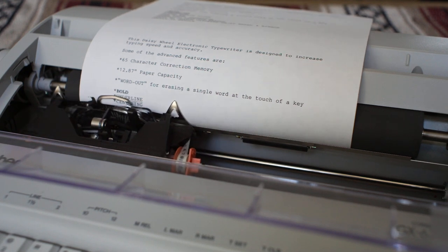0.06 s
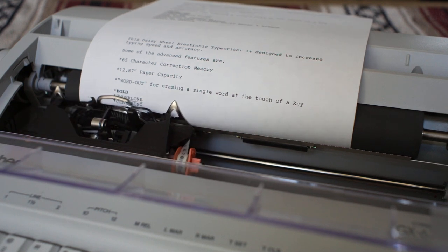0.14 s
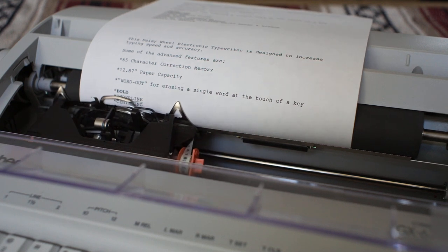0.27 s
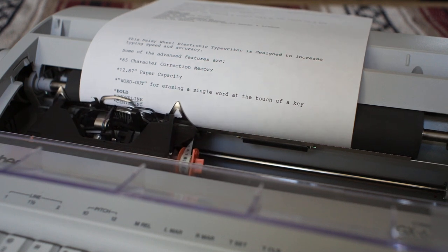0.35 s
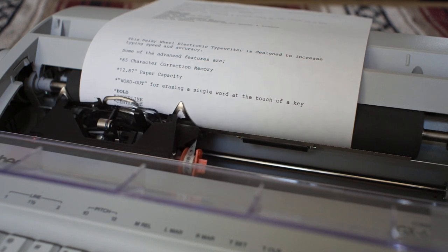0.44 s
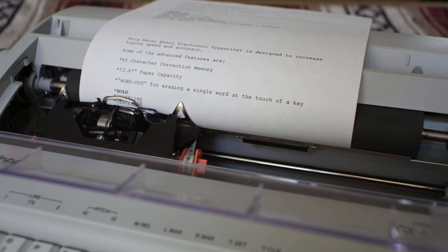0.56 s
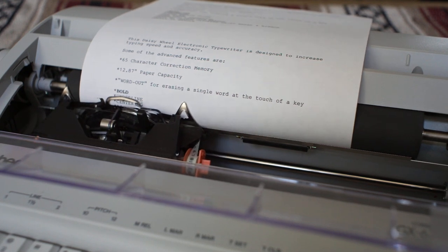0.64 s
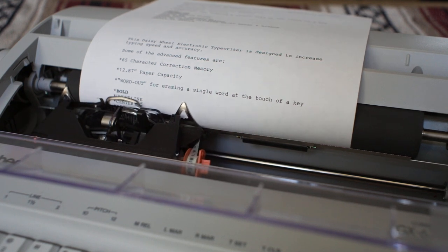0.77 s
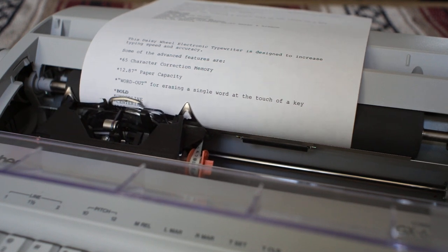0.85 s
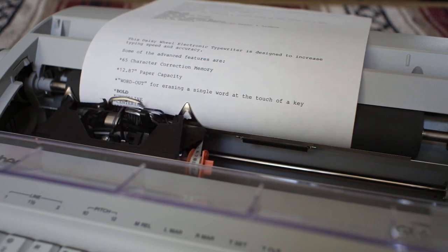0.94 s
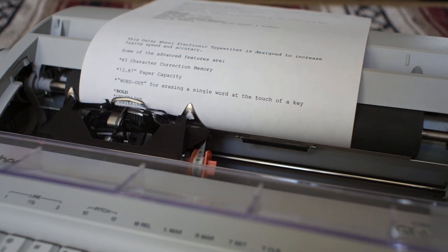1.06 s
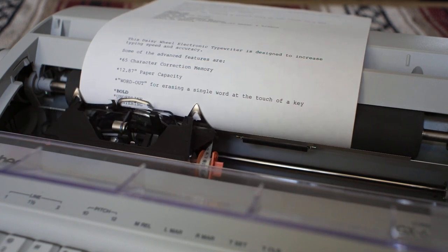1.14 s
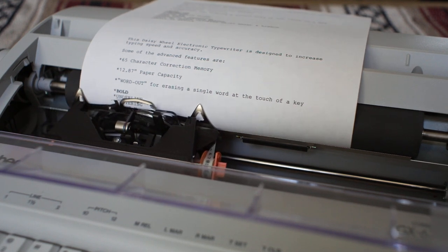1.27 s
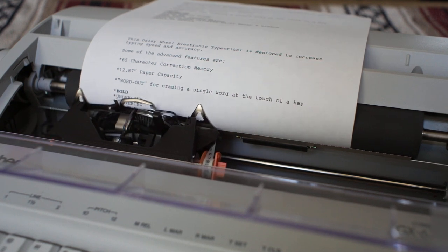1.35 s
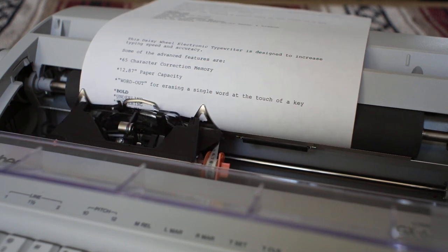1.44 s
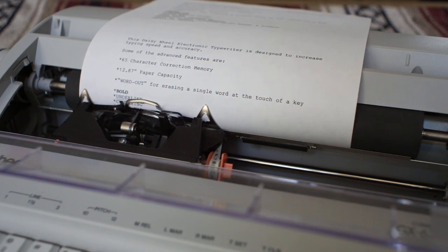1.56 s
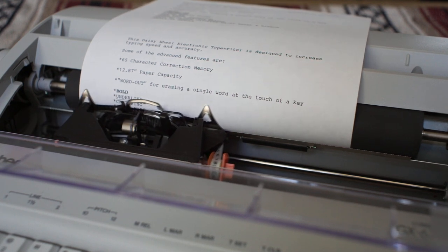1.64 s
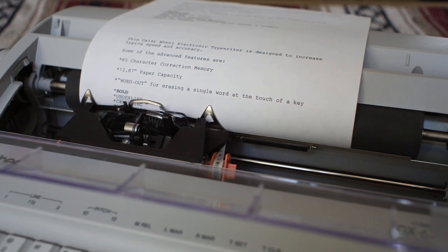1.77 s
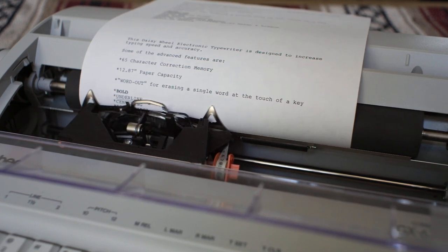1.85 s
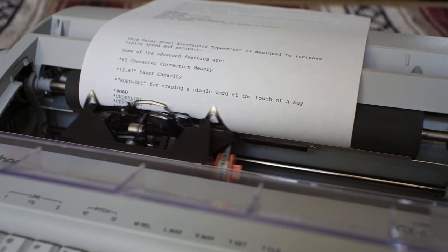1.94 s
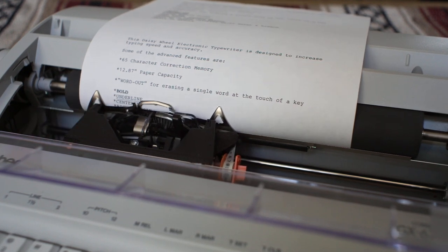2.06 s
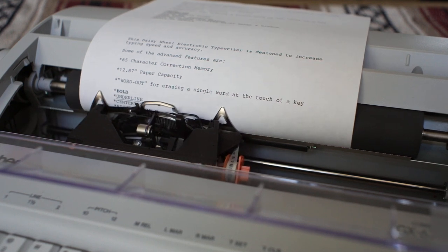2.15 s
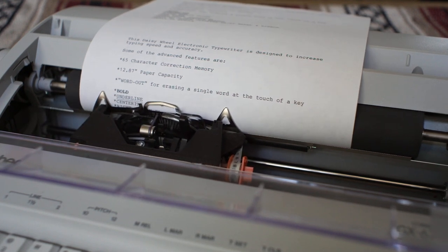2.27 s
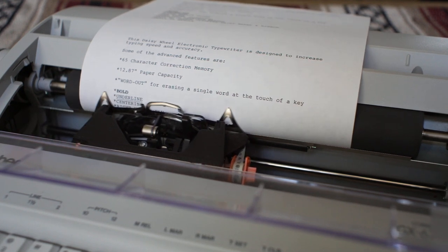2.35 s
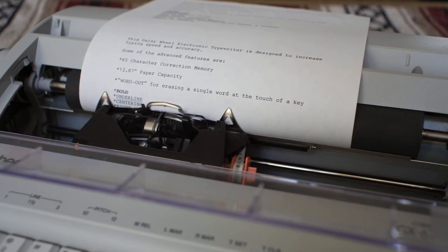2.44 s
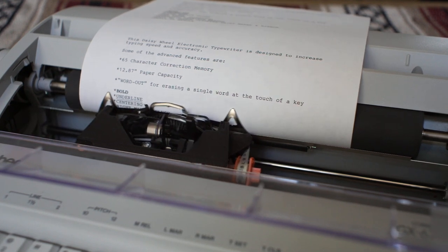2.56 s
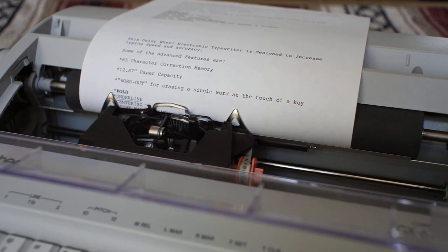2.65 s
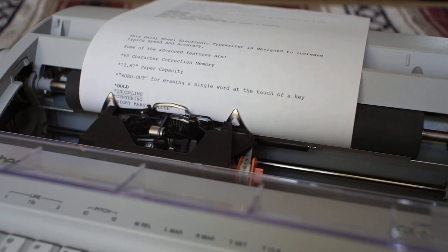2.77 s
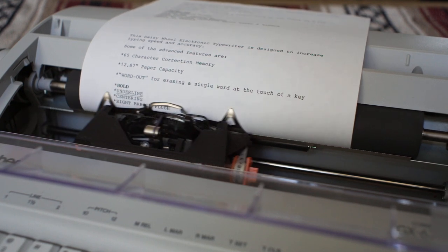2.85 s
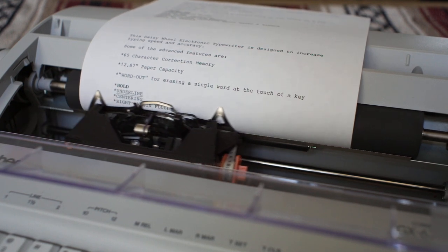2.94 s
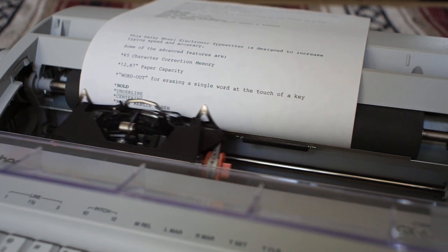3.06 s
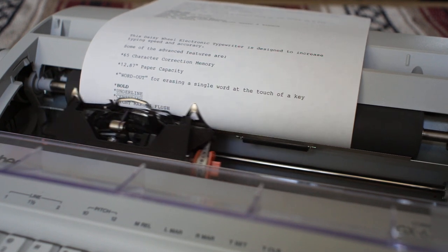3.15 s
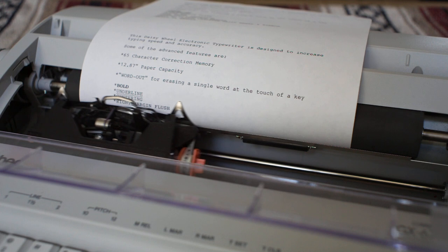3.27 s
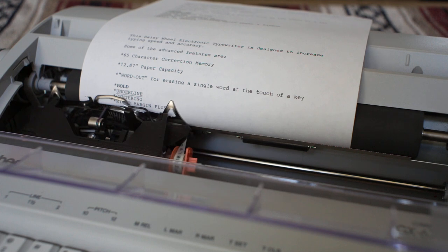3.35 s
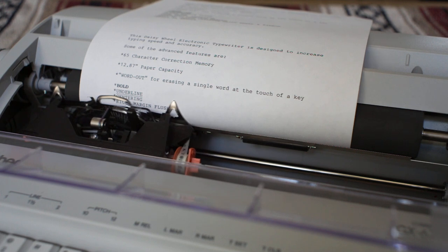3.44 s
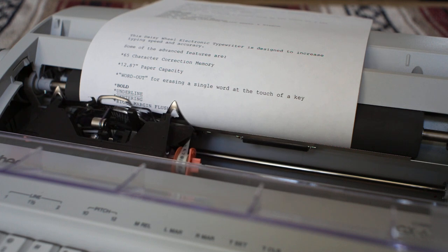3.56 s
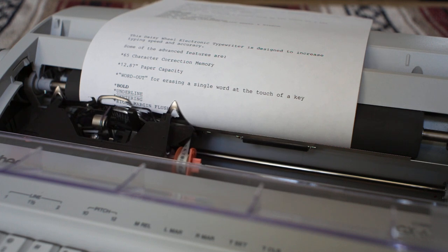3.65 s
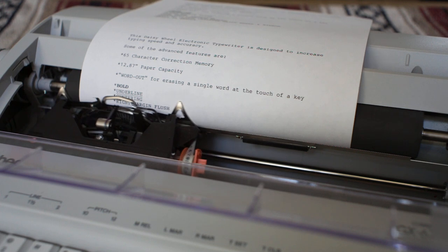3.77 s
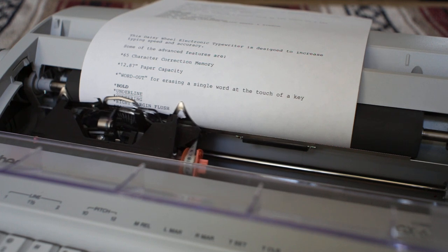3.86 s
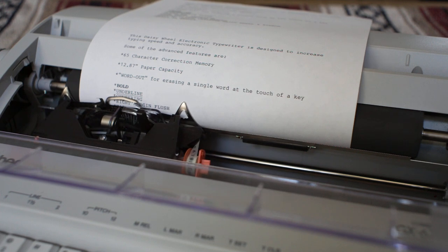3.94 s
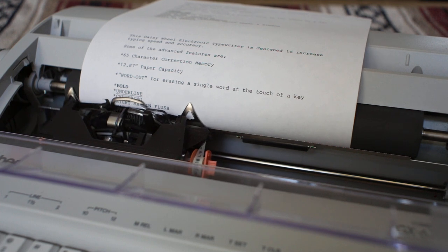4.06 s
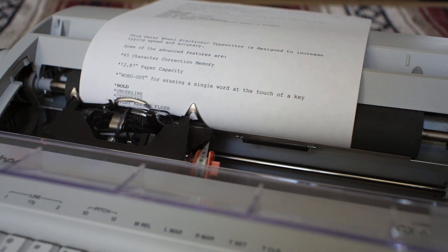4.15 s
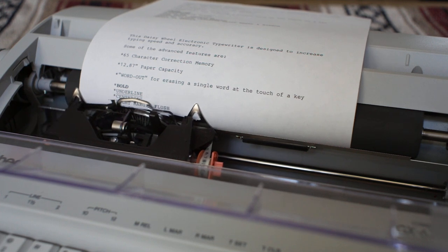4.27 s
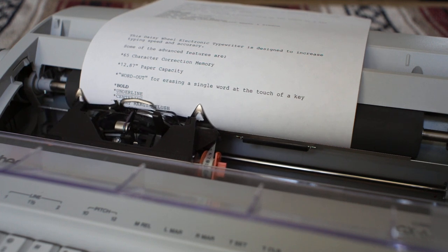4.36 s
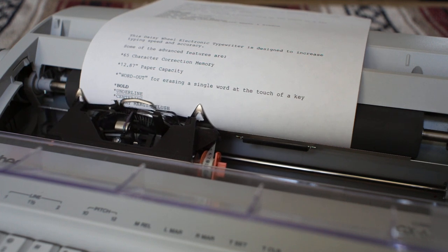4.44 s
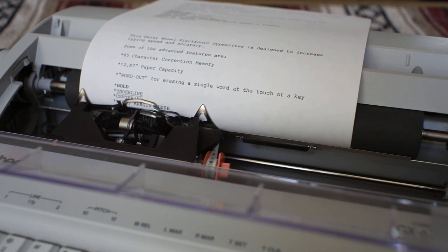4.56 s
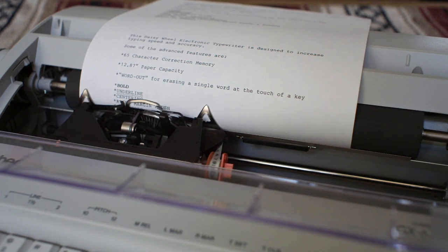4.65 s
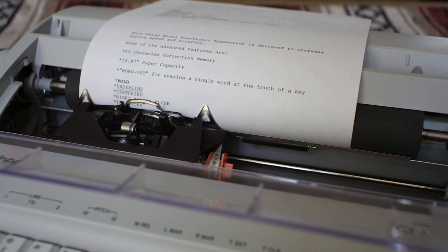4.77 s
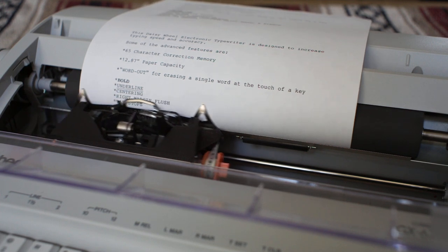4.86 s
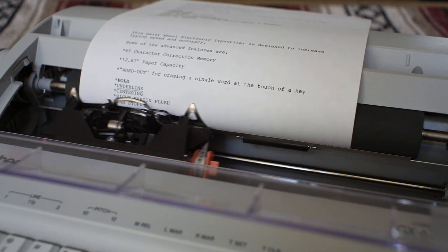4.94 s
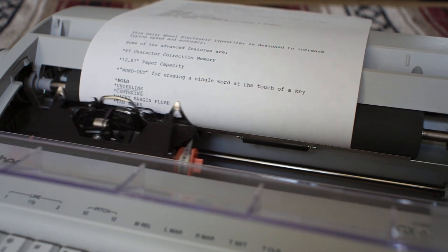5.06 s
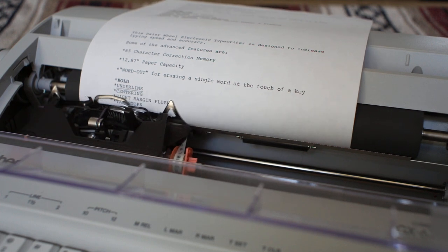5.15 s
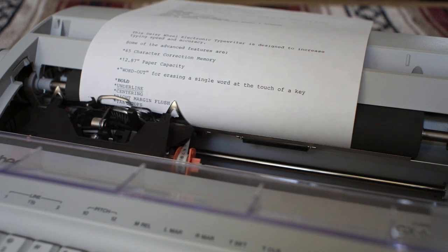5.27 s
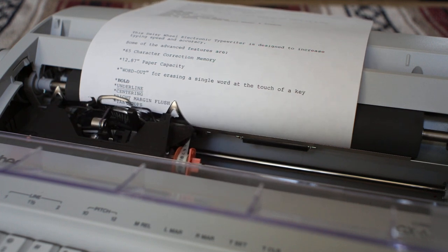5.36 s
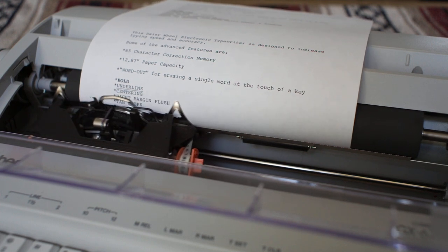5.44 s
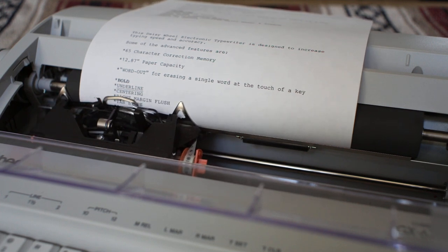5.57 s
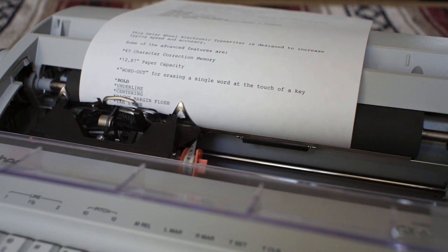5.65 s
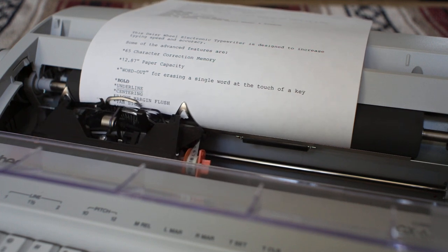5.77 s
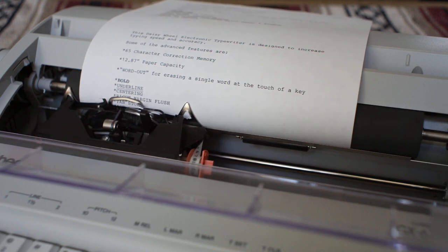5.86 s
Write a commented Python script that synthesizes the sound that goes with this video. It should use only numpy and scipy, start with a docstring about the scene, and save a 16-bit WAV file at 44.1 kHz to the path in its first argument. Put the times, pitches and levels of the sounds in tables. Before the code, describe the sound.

Close microphone on a desktop printing typewriter, dry with a short room tail. Seventeen snappy strikes come in a slightly uneven stream, quickening as they go, then a pause with a low steady buzz, clunky gears and soft motor whine. Nine more strikes, a second, briefer return, then four more until the end. Plastic case knocks and small carriage rattles sit under every hit; the background is very quiet.

```python
"""A platen feed dies away and a small motor whines up; an electric daisy wheel typewriter then prints.
Three short lines in a small room. Per letter: latch and ribbon pawl tick, hammer strikes and rebounds,
carriage steps on. Between lines the carriage hums back and the platen feeds the paper.
Contacts are noise bursts through resonant bodies; case and thud are decaying sines; motor and stepper
are wavering tones plus coloured noise."""
import sys
import numpy as np
from scipy import signal
from scipy.fft import rfft, irfft, next_fast_len
from scipy.io import wavfile
from scipy.ndimage import map_coordinates

SR = 44100
rng = np.random.default_rng(int(sys.argv[2]) if len(sys.argv) > 2 else 0)


def bounce(signal):
    """Save signal as a 16-bit WAV file at the path given by the first command-line argument."""
    frames = np.transpose(np.atleast_2d(signal))
    limited = np.clip(frames, -1, 1)
    pcm = np.round(limited * 32767).astype(np.int16)
    wavfile.write(sys.argv[1], SR, pcm)


N = 260631

# printed letters: [blow t/s, treble tilt of the petal's strike/dB]
LETTERS = [(0.269, 0.5), (0.448, 0.5), (0.6562, -1), (0.8436, 0.5), (1.0173, -3), (1.1386, -3.5),
           (1.2877, -4), (1.4433, -1), (1.5983, -3), (1.7037, -0.5), (1.8901, -4.5), (1.9896, 1.5),
           (2.156, -2.5), (2.2713, -0.5), (2.395, 2.5), (2.5152, 4.5), (2.6267, 0.5), (3.7145, 0.5),
           (3.8134, 2), (3.9131, 0), (4.0116, -0.5), (4.1409, -3.5), (4.2396, -5), (4.3833, -3),
           (4.5377, -2), (4.6375, -2), (5.483, -1), (5.5873, 1.5), (5.7183, 1.5), (5.8463, -4.5)]
# *_COLOUR: broad spectrum of a part [f/Hz, level/dB]
# *_MODES: resonances on top of it [f/Hz, width/Hz, height/dB]
# hammer driving a petal into the platen
HAMMER_COLOUR = [(100, -24), (160, -39), (300, -2.5), (600, -15.5), (1150, -13.5), (1600, -3), (2300, 2),
                 (4000, -2.5), (6300, -3), (7200, -8.5), (9300, 1), (12000, -8.5), (13500, -17.5),
                 (15800, -29)]
HAMMER_MODES = [(383, 500, 2.9), (862, 324, 13.4), (1503, 180, 8.1), (1820, 75, 2.8), (2146, 154, 6),
                (2357, 186, 9.05), (2585, 150, 3.3), (2868, 155, 7.7), (3270, 100, 6.6), (3837, 123, 7.9),
                (4360, 260, 5), (5100, 410, 4.7), (6465, 230, 7.5)]
# hammer falling back on its stop
REBOUND_COLOUR = [(100, -14.5), (300, -4.1), (700, -12.5), (1600, 0.5), (4000, -1), (7200, -7.5),
                  (9300, -2), (12000, -6), (13500, -17), (15800, -18)]
REBOUND_MODES = [(547, 190, 12.6), (830, 46, 11.8), (1065, 100, 9.1), (1489, 107, 8.2), (1680, 140, 6.9),
                 (2108, 83, 7.2), (6700, 420, 8.3), (8800, 890, 6.2), (11350, 240, 5.6)]
# latch pulling in
LATCH_COLOUR = [(200, -24), (700, -6.5), (1600, 2), (4000, 0.5), (7500, -7.5), (11500, -7.5),
                (13500, -26.5), (15800, -24)]
LATCH_MODES = [(750, 310, 7), (1384, 200, 7.8), (1865, 99, 10.2), (2190, 71, 10.3), (3270, 370, 8.8),
               (6500, 620, 8.6), (8700, 680, 6.3)]
# ribbon pawl
PAWL_COLOUR = [(200, -21), (500, -7.5), (2000, -7), (7500, -4.5), (10000, -1), (13500, -13.5),
               (15800, -28.5)]
PAWL_MODES = [(2010, 510, 6.4), (3500, 74, 2.8), (9100, 341, 4.5), (14600, 416, 6.4), (15241, 563, 12.1)]
# trigger freeing the hammer spring
TRIGGER_COLOUR = [(200, -8.5), (900, -9.5), (2000, 1), (4000, -7), (12000, -16), (14000, -38),
                  (15800, -26.5)]
TRIGGER_MODES = [(4800, 570, 7.5), (8400, 946, 8), (12897, 1347, 12.4)]
# carriage rattle and stop
CARRIAGE_COLOUR = [(40, -3), (140, -9), (400, -1), (1000, 1), (2300, -3), (7000, -9.5), (9000, -8.5),
                   (11500, -17), (14000, -27), (15800, -31.3)]
CARRIAGE_MODES = [(66, 20, 4), (93, 28, 10), (184, 36, 10), (335, 55, 5), (450, 45, 4), (815, 110, 4),
                  (2450, 50, 5), (3200, 150, 3)]
# hammer spring; also colours the motor's gear whirr
SPRING_COLOUR = [(100, -19), (700, -4), (1100, -7), (1500, 0), (2200, 0), (3000, -9), (10000, -17),
                 (15000, -33)]
# carriage and platen gears
GEARS_COLOUR = [(59, -43), (100, -22), (156, -3.5), (645, -2), (1010, -2.5), (1500, -1.5), (1980, -6),
                (2450, -2.5), (2720, -5.5), (3230, -10.5), (4340, -15), (8920, -18.5), (12000, -27),
                (15800, -39)]
GEARS_MODES = [(185, 70, 5), (560, 90, 4), (860, 110, 5), (1500, 120, 4), (2250, 150, 3), (3250, 260, 8)]
# plastic case booms, steel frame rings: [f/Hz, level/dB, t60/s]
CASE_MODES = [(66.4, -68.5, 0.43), (90, -61, 0.091), (112, -74, 0.069), (178.8, -67.5, 0.31),
              (261, -65, 0.073), (298, -53.5, 0.08), (548.3, -44, 0.058), (1277, -42, 0.04),
              (1854, -47, 0.066), (2160, -49.5, 0.061), (2420, -60, 0.17), (2640, -47, .07),
              (4050, -56.5, 0.15), (4740, -59.5, 0.16), (5500, -62, 0.12), (8900, -67, 0.068)]
# carriage runs back: [start t/s, end t/s]
RETURNS = [(2.894, 3.42), (4.9055, 5.197)]
# stepper hum: [multiple of STEP_HZ, level/dB]
STEP_ORDERS = [(1, -73.5), (3, -91), (4, -88.5)]
# carriage sliding on its rail: [f/Hz, level/dB]
SLIDE_COLOUR = [(120, -13), (250, 2), (400, 7), (600, 10), (1000, -12.5), (1900, -12.5), (2800, -8.5),
                (4000, -35.5), (10000, -15), (15000, -34)]
# room tone: [f/Hz, level/dB]
AIR_COLOUR = [(20, -16), (45, -7), (62, -7), (100, -13), (137, -19), (414, -9.5), (1100, -10.5),
              (1500, -10.5), (3050, -20), (5520, -27), (10000, -27.5), (15800, -35)]
# stereo width: [f/Hz, side level/dB]
SIDE_WIDTH = [(30, -19), (70, -19), (150, -20), (600, -16), (1200, -23), (2800, -24), (4500, -12),
              (6500, -25), (9000, -36), (13000, -17)]
# room decay: [f/Hz, t60/s]
ROOM_T60 = [(100, 0.15), (500, 0.49), (2000, 0.35), (5000, 0.35), (10000, 0.24), (15000, 0.25)]
# room spectrum: [f/Hz, level/dB]
ROOM_COLOUR = [(60, 6), (200, -3), (600, 1), (2300, -3), (5000, -1.5), (10000, -2), (15000, -15)]
# gear jolts as the carriage sets off: [delay/s, level/dB, rise/s, t60/s, treble tilt/dB]
SET_OFF = [(0, -33, 0.0026, 0.068, -15), (0.0082, -25.5, 0.0011, 0.079, 10), (0.0264, -34, 0.0013, 0.06, 6)]
# as it pulls up: [delay/s, level/dB, rise/s, t60/s, treble tilt/dB]
PULL_UP = [(0, -36, 0.0046, 0.058, -4), (0.01, -32.5, 0.0021, 0.067, -3),
           (0.018, -33.5, 0.0022, 0.05, -6.5)]
# as the platen turns one line: [delay/s, level/dB, rise/s, t60/s, treble tilt/dB]
LINE_FEED = [(0, -31, 0.0037, 0.1, -14), (0.008, -30.3, 0.0016, 0.057, -1.7),
             (0.027, -32, 0.0009, 0.09, 10.5), (0.04, -30.5, 0.004, 0.053, -4.7)]
# platen line feeds: [t/s]
FEEDS = [-0.0071, 3.494, 5.2715]
# print motor runs: [start t/s, power off t/s]
MOTOR_RUNS = [(0.095, 2.68), (3.58, 4.71), (5.365, 6.0)]

SIZE = 8192  # samples in one contact sound
AGE, TIME = np.arange(SIZE) / SR, np.arange(N) / SR  # s
BINS = np.fft.rfftfreq(SIZE, 1 / SR)  # Hz
TOP_HZ, STEP_HZ, THUD_HZ = 16100, 459, 85.4
# blows alternate soft, hard: hard adds these, soft subtracts them
SWING_STRIKE_DB, SWING_KNOCK_DB, SWING_REBOUND_DB = 0.77, -1.9, -0.5
# platen knock band in the strike's colour: strongest at the left margin
KNOCK_DB, KNOCK_FADE_DB_PER_LETTER = 8, 0.6
# lead of each part on the blow
LATCH_LEAD_S, PAWL_LEAD_S, PAWL_BACK_LEAD_S = 0.0379, 0.0265, 0.0192
TRIGGER_LEAD_S, SPRING_LEAD_S = 0.0116, 0.0065
SLOW_HZ, WHINE_HZ = 720, 888  # whine at zero and full speed, before jitter
SPIN_UP_S, COAST_S = 0.06, 0.13
MOTOR_DB, MOTOR_SPEED_POWER = -77, 0.8  # settled level; amplitude goes as speed ** power
FRESH_DB, SETTLE_S = 8, 1.2  # extra level at line start, settling time
HUM_DELAY_S, HUM_BRAKE_S, HUM_FADE_S = 0.023, 0.005, 0.009  # after start, before end, ramp


def amp(db):
    """Decibels to gain."""
    return 10 ** (np.asarray(db) / 20)


def unit(x):
    """Scale to rms 1."""
    return x / np.sqrt(np.mean(x ** 2) + 1e-20)


def along(points, hz):
    """(Hz, value) points read on a log frequency axis."""
    f, v = np.transpose(points)
    return np.interp(np.log(hz + 1), np.log(f + 1), v)


def wobble(rate):
    """Smooth random curve, rate knots a second."""
    knots = rng.standard_normal(int(N * rate / SR) + 4)
    return map_coordinates(knots, [TIME * rate])


def filtered(x, response):
    """x times a zero-phase response of frequency."""
    m = next_fast_len(N + SR // 2)
    return irfft(rfft(x, m) * response(np.fft.rfftfreq(m, 1 / SR)), m)[..., :N]


def noise(spectrum):
    """Coloured noise of rms 1."""
    return unit(filtered(rng.standard_normal(N), lambda hz: amp(along(spectrum, hz))))


def body(spectrum, modes=()):
    """Response of a part in dB: broad colour plus resonances."""
    peaks = sum(db / (1 + (2 * (BINS - hz) / width) ** 2) for hz, width, db in modes)
    return along(spectrum, BINS) + peaks


def treble(corner_hz):
    """Shelf climbing from 0 to 1 around the corner."""
    return BINS ** 2 / (BINS ** 2 + corner_hz ** 2)


def ring(force, response_db):
    """Each row of force excites a causal, minimum-phase body; each result has energy 1."""
    cepstrum = irfft(np.log(amp(response_db)))
    # fold onto positive time
    cepstrum[..., 1:SIZE // 2] *= 2
    cepstrum[..., SIZE // 2 + 1:] = 0
    out = irfft(rfft(force) * np.exp(rfft(cepstrum)))
    return out / np.linalg.norm(out, axis=-1, keepdims=True)


def chatter(rise, t60, alike, count):
    """Bursts of contact force, fairly even in spectrum; the same parts meet, so partly alike."""
    shape = (1 - np.exp(-(AGE / rise) ** 2)) * amp(-60 * AGE / t60)
    shape = shape / shape.max(axis=-1, keepdims=True)
    draws = rng.standard_normal((count + 1, SIZE))
    mixed = np.sqrt(alike) * draws[0] + np.sqrt(1 - alike) * draws[1:]
    z = rfft(shape * mixed)
    flattened = irfft(z / (np.abs(z) + 1e-9) ** .75)
    return flattened * np.minimum(1, 3 * shape)


def placed(times, levels_db, sounds):
    """Lay one sound at each time."""
    out = np.zeros(N + 2 * SR)  # 1 s margin at both ends
    for s, db, sound in zip(times, levels_db, sounds):
        out[SR + round(s * SR):][:SIZE] += amp(db) * sound
    return out[SR:SR + N]


def contact(times, response_db, level_db, rise, t60, alike):
    """One kind of contact per letter, never quite equally hard."""
    levels = level_db + rng.normal(0, .4, len(times))
    force = chatter(rise, t60, alike, count=len(times))
    return placed(times, levels, ring(force, response_db))


def room(x):
    """Room answer: decaying noise, a new tail for each letter as the carriage moves."""
    starts = [0] + [int((row[0] - .045) * SR) for row in LETTERS[1:]] + [N]
    out = np.zeros(N + SR)
    for a, b in zip(starts, starts[1:]):
        hz, t, z = signal.stft(rng.standard_normal(SR // 2), SR, nperseg=256)
        fade_db = -60 * t / along(ROOM_T60, hz)[:, None]
        build_up = 1 - np.exp(-t / 0.0041)
        tail = signal.istft(z * amp(fade_db) * build_up, SR, nperseg=256)[1]
        answer = signal.fftconvolve(x[a:b], tail / np.linalg.norm(tail))
        out[a:a + len(answer)] += answer
    return filtered(out[:N], lambda hz: amp(along(ROOM_COLOUR, hz)))


def print_motor():
    """Motor spins up for each line and coasts after power off; whine and gear whirr follow its speed."""
    out = np.zeros(N)
    for on, off in MOTOR_RUNS:
        powered, coasting = np.maximum(TIME - on, 0), np.maximum(TIME - off, 0)
        speed = (1 - np.exp(-powered / SPIN_UP_S)) * np.exp(-(coasting / COAST_S) ** 2)
        level_db = MOTOR_DB + FRESH_DB * np.exp(-(powered / SETTLE_S) ** 2)
        pitch_hz = (SLOW_HZ + (WHINE_HZ - SLOW_HZ) * speed) * (1 + .008 * wobble(rate=30))
        tone = np.sqrt(2) * np.sin(2 * np.pi * np.cumsum(pitch_hz) / SR)
        whine = tone * amp(3 * wobble(rate=90) - 3)
        whirr = amp(-4.5) * noise(SPRING_COLOUR)
        out += amp(level_db) * speed ** MOTOR_SPEED_POWER * (whine + whirr)
    return out


def carriage_return():
    """Stepper hums at a nearly steady rate while the carriage slides back along its rail."""
    running = np.zeros(N)
    for start, end in RETURNS:
        inside_s = np.minimum(TIME - start - HUM_DELAY_S, end - HUM_BRAKE_S - TIME)
        running += np.clip(inside_s / HUM_FADE_S, 0, 1)
    phase = 2 * np.pi * np.cumsum(STEP_HZ * (1 + .012 * wobble(rate=50))) / SR
    hum = sum(amp(db) * np.sqrt(2) * np.sin(round(k) * phase) for k, db in STEP_ORDERS)
    slide = amp(-83 + 1.2 * wobble(rate=30)) * noise(SLIDE_COLOUR)
    return running * (hum * amp(2.3 * wobble(rate=51)) + slide)


def jolts(times, pattern):
    """One pattern of gear jolts at each of the times."""
    delay, db, rise, t60, treble_db = np.transpose(pattern)
    colour = body(GEARS_COLOUR, GEARS_MODES) + np.outer(treble_db, treble(corner_hz=4230))
    out = np.zeros(N)
    for s in times:
        force = chatter(rise[:, None], t60[:, None], alike=0.13, count=len(db))
        out += placed(s + delay, db, ring(force, colour))
    return out


def feed_gears():
    """Gears jolt as the carriage starts and stops its return and as the platen turns one line."""
    starts, ends = np.transpose(RETURNS)
    return jolts(starts, SET_OFF) + jolts(ends, PULL_UP) + jolts(FEEDS, LINE_FEED)


def carriage_steps():
    """After each letter the carriage rattles one place along and bumps to rest."""
    s = np.transpose(LETTERS)[0]
    colour = body(CARRIAGE_COLOUR, CARRIAGE_MODES)
    travel = np.interp(AGE, [0, .012, .03, .052, .062], [0.51, 0.99, 0.78, 0.35, 0.11])
    rattle = ring(travel * rng.standard_normal((len(s), SIZE)), colour)
    dull = colour - 9 * treble(corner_hz=2500)
    stop = contact(s + .06, dull, level_db=-31.5, rise=0.005, t60=.06, alike=0.23)
    return placed(s + .012, rng.normal(-24.5, 1.0, len(s)), rattle) + stop


def wind_up():
    """Before each blow: latch pulls in, ribbon pawl ticks twice, trigger frees the hammer spring."""
    s, _ = np.transpose(LETTERS)
    latch = contact(s - LATCH_LEAD_S, body(LATCH_COLOUR, LATCH_MODES),
                    level_db=-20.5, rise=0.00093, t60=0.041, alike=0.48)
    pawl = body(PAWL_COLOUR, PAWL_MODES)
    first = contact(s - PAWL_LEAD_S, pawl, level_db=-23, rise=0.0009, t60=0.039, alike=0.86)
    second = contact(s - PAWL_BACK_LEAD_S, pawl - 9 * treble(corner_hz=11000),
                     level_db=-27.5, rise=.0012, t60=.028, alike=.4)
    trigger = contact(s - TRIGGER_LEAD_S, body(TRIGGER_COLOUR, TRIGGER_MODES),
                      level_db=-26, rise=.0006, t60=.025, alike=.6)
    spring = contact(s - SPRING_LEAD_S, body(SPRING_COLOUR),
                     level_db=-26.5, rise=.002, t60=.05, alike=.5)
    return latch + first + second + trigger + spring


def blows(s):
    """Strike, platen knock and rebound in dB, from turn in the soft-hard cycle and place in the line."""
    count = np.arange(len(s))
    hard = np.where(count % 2, 1, -1)
    line = np.searchsorted(FEEDS, s)
    place = count - np.searchsorted(line, line)
    knock_db = KNOCK_DB - KNOCK_FADE_DB_PER_LETTER * place + SWING_KNOCK_DB * hard
    return SWING_STRIKE_DB * hard, knock_db, SWING_REBOUND_DB * hard


def case_booms(count):
    """Each blow rings case and frame modes; the recoil pushes the machine down on its feet."""
    hz, mode_db, t60 = np.transpose(CASE_MODES)[:, :, None]
    modes = amp(mode_db - 60 * AGE / t60) * np.sin(2 * np.pi * hz * AGE)
    strengths = amp(rng.normal(0, 1.5, (count, len(CASE_MODES))))
    thud = amp(-52 - 60 * AGE / .055) * np.sin(2 * np.pi * THUD_HZ * AGE)
    thud *= 1 - np.exp(-AGE / .01)
    return strengths @ modes * (1 - np.exp(-AGE / 0.0032)) + thud


def hammer():
    """Hammer drives a petal into the platen, falls back on its stop and shakes the case."""
    s, bright_db = np.transpose(LETTERS)
    db, knock_db, rebound_db = blows(s)
    platen = 1 / (1 + ((BINS - 920) / 200) ** 4)
    # each petal's shape stresses the resonances differently
    stress_db = rng.normal(0, 2, (len(s), len(HAMMER_MODES)))
    petals = np.array([body(HAMMER_COLOUR, HAMMER_MODES + np.outer(row, [0, 0, 1]))
                       for row in stress_db])
    # a stronger platen knock takes energy from the hollow band below it
    hollow = .45 / (1 + ((BINS - 430) / 170) ** 4)
    petals = petals - np.outer(knock_db - knock_db.mean(), hollow)
    colour = petals + np.outer(bright_db, treble(corner_hz=4500)) + np.outer(knock_db, platen)
    strike = contact(s - .0008, colour, level_db=db - 8.3, rise=.001, t60=.026, alike=.5)
    rebound = contact(s + .0066, body(REBOUND_COLOUR, REBOUND_MODES),
                      level_db=rebound_db - 14.5, rise=0.0011, t60=0.037, alike=0.33)
    return strike + rebound + placed(s, db, case_booms(len(s)))


def scene():
    """Machine straight ahead, nearly mono; lid reflections reach the two sides differently."""
    machine = print_motor() + carriage_return() + feed_gears() + carriage_steps() + wind_up() + hammer()
    mid = machine + amp(-15.5) * room(machine) + amp(-75.0) * noise(AIR_COLOUR)
    lid = rng.standard_normal(SIZE) * amp(-60 * AGE / .012)
    near = signal.fftconvolve(machine, lid / np.linalg.norm(lid))[:N]
    spread = amp(-3) * near + amp(-7) * room(machine)
    diffuse = amp(-88) * noise(AIR_COLOUR)
    side = filtered(spread, lambda hz: amp(along(SIDE_WIDTH, hz))) + diffuse
    return np.array([mid + side, mid - side]) * amp([[-.1], [.1]])


def record(dry):
    """High-pass around 42 Hz, steep low-pass at TOP_HZ."""
    def band(hz):
        return hz ** 4 / (hz ** 4 + 42 ** 4) / (1 + (hz / TOP_HZ) ** 120)
    return filtered(dry, band)


dry = scene()
out = record(dry)
bounce(out)
```